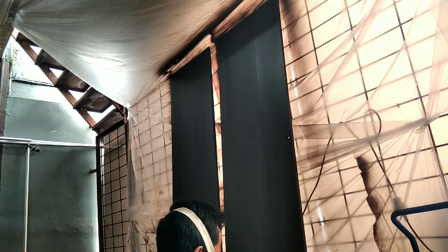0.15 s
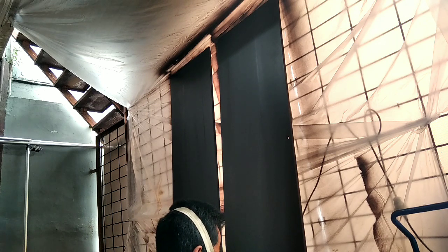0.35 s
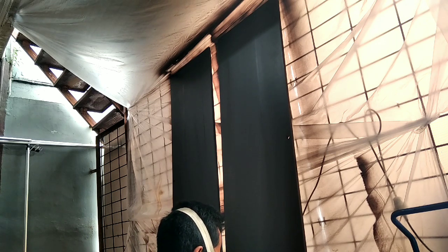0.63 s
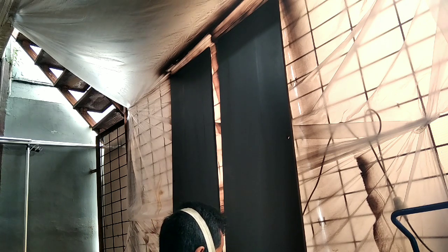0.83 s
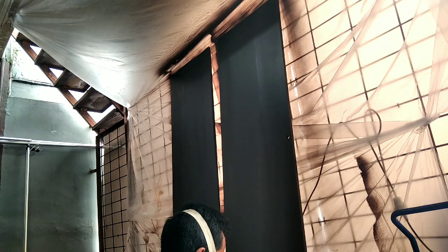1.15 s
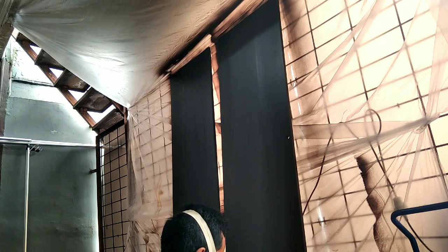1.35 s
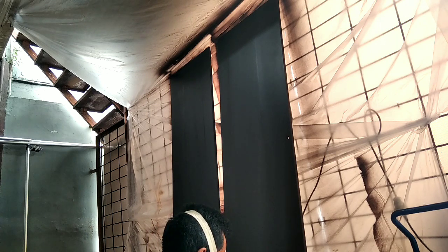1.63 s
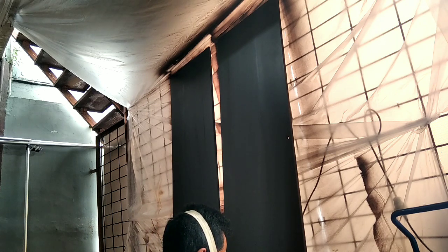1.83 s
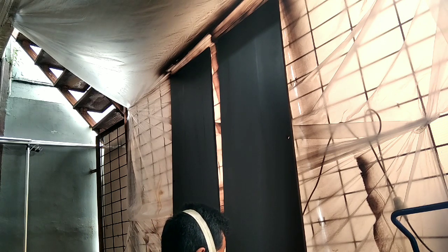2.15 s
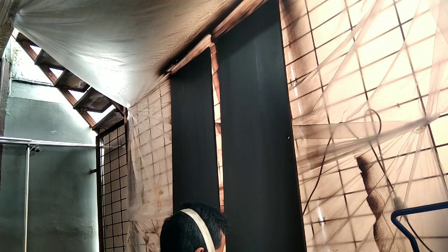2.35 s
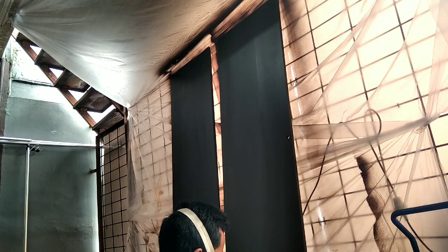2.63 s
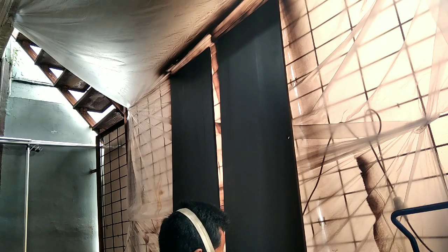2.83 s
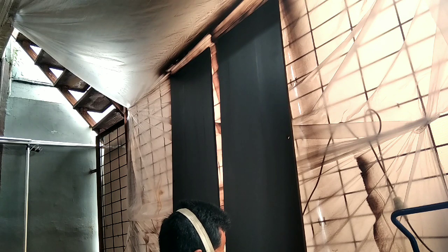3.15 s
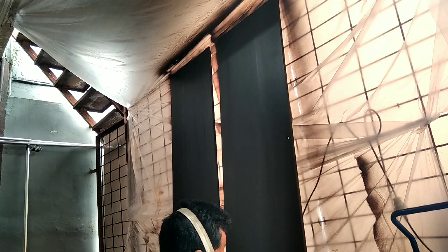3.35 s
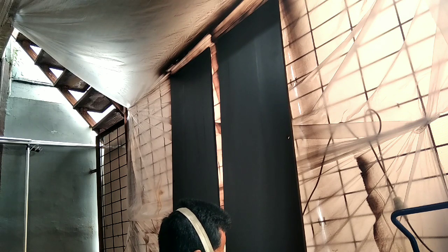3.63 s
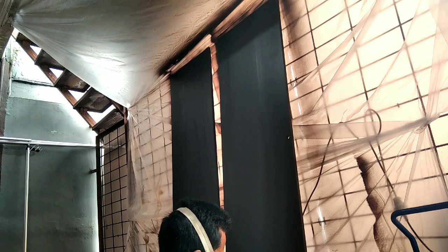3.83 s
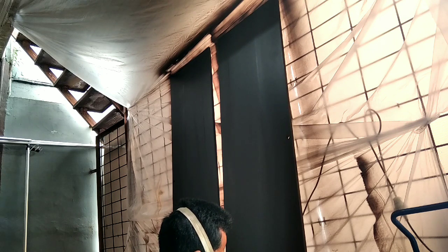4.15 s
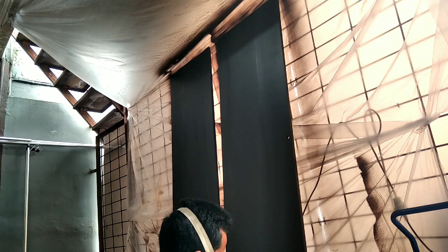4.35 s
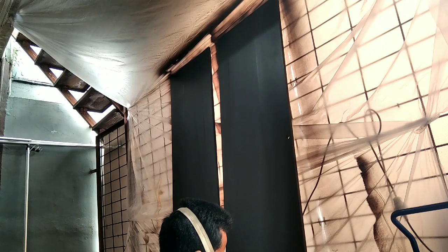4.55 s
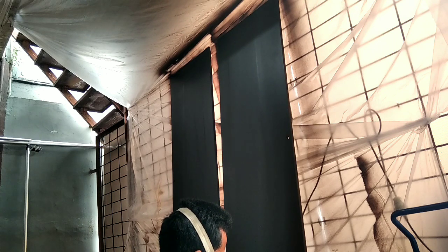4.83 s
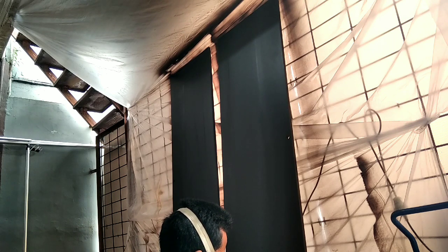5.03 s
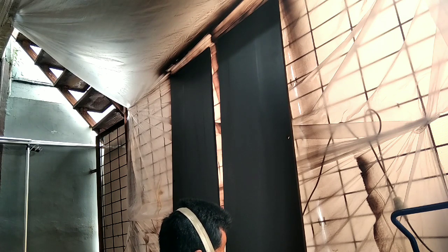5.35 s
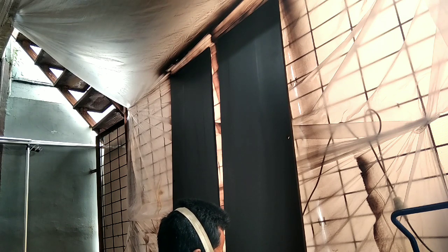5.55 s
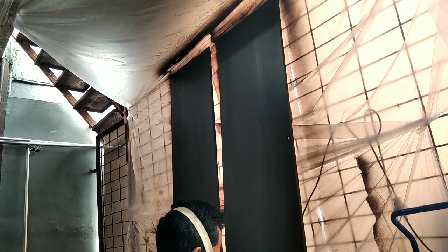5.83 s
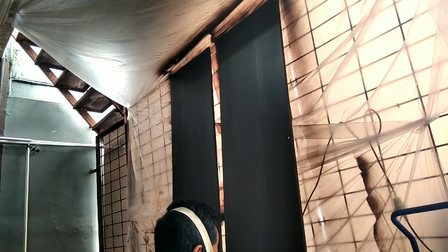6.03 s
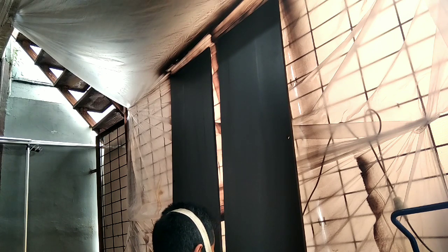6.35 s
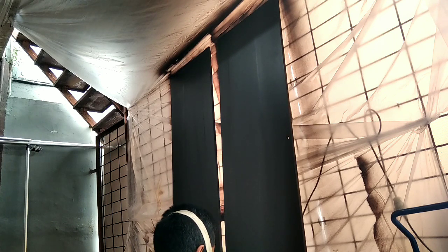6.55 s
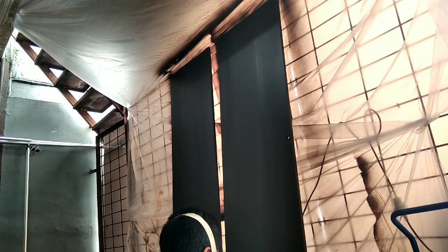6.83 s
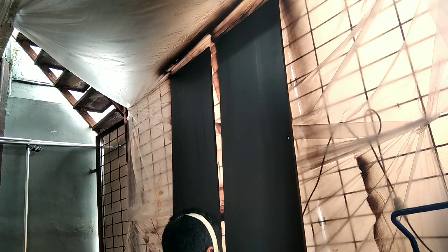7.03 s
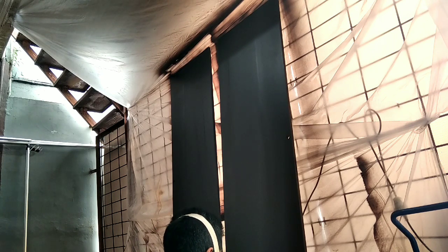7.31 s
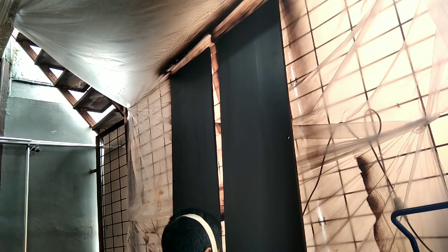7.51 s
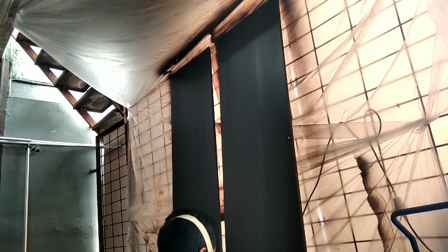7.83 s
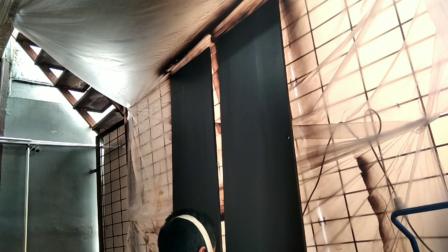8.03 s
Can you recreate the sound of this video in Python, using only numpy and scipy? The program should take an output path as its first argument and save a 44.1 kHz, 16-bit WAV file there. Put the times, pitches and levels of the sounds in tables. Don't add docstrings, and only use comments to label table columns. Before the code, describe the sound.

Steady throbbing compressor hum with hollow intake roar and thin air leak, one tiny metallic tick, then a bright paint-spray hiss at the end.

```python
import sys
import numpy as np
from scipy import signal
from scipy.fft import rfft, irfft, next_fast_len
from scipy.io import wavfile
from scipy.ndimage import uniform_filter1d, map_coordinates

SR = 44100
rng = np.random.default_rng(int(sys.argv[2]) if len(sys.argv) > 2 else 0)


def rack_gain(trim_db):
    fader = np.asarray(trim_db, float)
    return 10 ** (fader / 20)


def inscribe(sig):
    pcm = np.round(np.clip(np.atleast_2d(sig).T, -1, 1) * 32767)
    wavfile.write(sys.argv[1], SR, pcm.astype(np.int16))


N = 360738
TIME = np.arange(N) / SR
BELT_LAPS = 0.096


# t/s, speed/turns per s
CRANK_SPEED = [
    (0, 23.725),
    (8.18, 23.645),
]


def compressor():
    turns = np.cumsum(curves(CRANK_SPEED)[0]) / SR
    lap = 2 * np.pi * BELT_LAPS * turns
    puff = np.cos(2 * np.pi * turns - 1.3) + 0.7 * np.cos(4 * np.pi * turns - 2.9)
    spit_db = leak_spits()
    hum = rack_gain(0.66) * (crank_hum(turns) + second_shaft(turns))
    air = valve_whine() + valve_air(spit_db, lap, puff) + thin_leak(spit_db, lap, puff)
    return hum + intake_roar(turns, lap) + air


# order, left level/dB, right level/dB
STRONG_ORDERS = [(2, -56, -57), (4, -63, -63), (7, -61, -62), (8, -60, -57), (9, -59, -65), (10, -64, -61),
                 (11, -60, -59), (14, -51, -55), (15, -47, -49), (18, -64, -56), (19, -56, -53),
                 (21, -55, -71), (22, -55, -53), (23, -65, -58), (24, -56, -53), (25, -55, -68),
                 (26, -55, -66), (28, -51, -49), (29, -42, -41), (30, -56, -49), (31, -50, -50),
                 (38, -61, -47), (41, -60, -56), (43, -52, -56), (44, -52, -68)]
# order, level/dB
FAINT_ORDERS = [(1, -73), (5, -67), (20, -68), (27, -60), (35, -54), (45, -59), (47, -69), (50, -64)]


def crank_hum(turns):
    order, db = np.transpose(FAINT_ORDERS)
    rest = np.setdiff1d(np.arange(1, 51), [row[0] for row in STRONG_ORDERS])
    scatter_db = 1.5 * rng.standard_normal((len(rest), 2))
    level = np.interp(rest, order, db)[:, None] + scatter_db
    orders = STRONG_ORDERS + np.c_[rest, level].tolist()
    return lines(orders, turns, flutter_db=0.6, slip=0.004, spread=1.3)


# order, left level/dB, right level/dB
SHAFT_ORDERS = [(9.192, -82, -72), (10.256, -66, -63), (10.808, -65, -66), (11.288, -63, -68),
                (11.712, -67, -69), (12.288, -65, -67), (12.712, -59, -60), (13.258, -62, -60),
                (13.71, -69, -68), (14.712, -53, -50), (15.712, -62, -61), (17.712, -64, -62),
                (22.52, -54, -58), (27.52, -50, -69)]


def second_shaft(turns):
    return lines(SHAFT_ORDERS, turns, flutter_db=0.6, slip=0.017, spread=4.11)


def lines(table, turns, flutter_db, slip, spread):
    out = np.zeros((2, N))
    for order, *db in table:
        start = spread * rng.standard_normal()
        apart = 0.016 * order * rng.standard_normal()
        phase = 2 * np.pi * order * turns + start + slip * order * wobble(6)
        level = rack_gain(np.c_[db] + flutter_db * wobble(2.7))
        out += level * np.sqrt(2) * np.sin(phase + np.c_[[apart / 2, -apart / 2]])
    return out


# t/s, rise level/dB
ROAR_SURGES = [(0.11, 5), (1.45, 5.5), (1.74, 6.5), (2.33, 6.5), (3.19, 4.5), (3.5, 4.5), (4.53, 3.5),
               (5.92, 2.9), (6.33, 4.5), (6.76, 3.5), (6.88, 4), (7.15, 5.5)]
# f/Hz, level/dB per Hz
ROAR_COLOUR = [(20, -34), (45, -22), (80, -20.5), (120, -18), (240, -18), (330, -12), (430, -13.5),
               (560, -10.5), (750, -4.5), (1000, -1.5), (1150, -9), (1350, -15), (1900, -14), (2600, -25.5),
               (4000, -120)]
# f/Hz, width/Hz, left level/dB, right level/dB
ROOM_MODES = [(405, 20, -16, -15), (485, 14, -11, -10), (552, 12, -9, -11), (580, 9, -8, -12),
              (607, 9, -1, -9), (627, 9, -1, -6), (650, 9, -5, -10), (692, 10, -1, -2), (740, 9, -3, -5),
              (775, 16, -9, -7), (814, 9, -2, -6), (836, 9, -2, 0), (864, 9, 1, -6), (886, 9, 2, -5),
              (907, 9, -7, 1), (930, 8, -5, -1), (962, 7, 5, -2), (973, 7, 2, 5), (1004, 9, -10, -2),
              (1022, 9, -1, -3), (1046, 9, -9, -2), (1180, 9, -12, -16), (1208, 9, -18, -13)]


def intake_roar(turns, lap):
    stroke_db = 0.89 * np.cos(2 * np.pi * turns) + 3.1 * np.cos(4 * np.pi * turns + 0.84)
    stroke = rack_gain(stroke_db + 1.3 * wobble(20))
    source = rng.standard_normal((2, N + SR)) * np.pad(stroke, (SR, 0), "reflect")
    apart = np.exp(0.35j * rng.standard_normal((len(ROOM_MODES), 2, 1)))

    def modes(hz):
        total = 0
        for k, (centre, width, *db) in enumerate(ROOM_MODES):
            damping = 1j * hz * width
            resonance = damping / (centre * centre - hz * hz + damping)
            total = total + (-1) ** k * apart[k] * rack_gain(np.c_[db]) * resonance
        return total

    level_db = -35 + swells(ROAR_SURGES, 0.026) + 0.2 * np.cos(lap - 1.6) + 1.4 * wobble(5)
    standing = rack_gain(level_db) * unit(filtered(source[0], modes)[:, SR:])
    diffuse = rack_gain(-35.5) * coloured(shop(source[1]), ROAR_COLOUR)
    throb = rack_gain(1.1 * np.cos(2 * np.pi * (turns - 0.3)))
    return throb * (diffuse + standing)


# f/Hz, level/dB per Hz
WHINE_COLOUR = [(900, -120), (1420, -18), (1520, -7), (1550, -3), (1635, 0), (1750, -4), (1830, -15),
                (2600, -120)]
# t/s, rise level/dB
SINGING = [
    (.05, 1),
    (1.03, 4),
    (1.9, 0.5),
    (2.62, 3.5),
    (3.5, 4),
    (4.55, 2),
    (6.7, 4),
    (7.2, 3.5),
]


def valve_whine():
    sag_db = 0.13 * (TIME - 4)
    level_db = -46 - sag_db + swells(SINGING, 0.14) + 0.56 * wobble(5.9)
    return hiss(WHINE_COLOUR, level_db, point=0.32)


# f/Hz, level/dB per Hz
AIR_COLOUR = [(1100, -25), (1900, -2.5), (2330, 0), (2520, 2), (2680, -4.5), (2880, -2.5), (3130, -1),
              (4870, -4.5), (5460, -8), (6500, -6), (8450, -21), (14300, -120)]


def valve_air(spit_db, lap, puff):
    level_db = -42.5 + 0.29 * spit_db + 0.1 * np.cos(lap - 0.9) + 0.15 * puff
    return hiss(AIR_COLOUR, level_db, point=0.42)


# f/Hz, level/dB per Hz
LEAK_COLOUR = [(3200, -17), (5500, -6), (7160, -3.5), (7790, 1.5), (8570, 0), (9400, 2.5), (11500, -7),
               (12600, -5), (13500, -9.5), (14300, -13), (16000, -23.5)]


def thin_leak(spit_db, lap, puff):
    level_db = -42.5 + spit_db + 0.29 * np.cos(lap - 1.4) + 0.45 * puff + 0.38 * wobble(22)
    return hiss(LEAK_COLOUR, level_db, point=0.22)


# t/s, rise level/dB
SPITS = [(0.19, 2), (0.52, 2.6), (0.98, 2.5), (1.32, 2.1), (1.59, 1.5), (1.76, 2.8), (1.97, 1.6), (2.25, 1),
         (2.51, 0), (2.71, 2.7), (3.26, 1.5), (3.58, 1.5), (3.7, 2), (4.04, 1), (4.49, 1.3), (5.95, 3),
         (6.17, 1.9), (7.25, 2.2)]


def leak_spits():
    return swells(SPITS, 0.041)


# f/Hz, level/dB per Hz
JET_COLOUR = [(1800, -40), (3000, -7.5), (4700, -5), (6400, -5), (8000, -2), (9400, 5), (11500, -0.5),
              (13700, -1.5), (14300, -5), (16000, -16)]
# t/s, jet level/dB, left-right level/dB
TRIGGER_PULL = [
    (7.44, -40, 5.5),
    (7.476, -30.5, -5),
    (8.0, -32, -2),
    (8.18, -35.5, -5),
]


def spray():
    jet_db, pan_db = curves(TRIGGER_PULL)
    opening = np.clip((TIME - 7.448) / 0.012, 0, 1) ** 2
    jet = coloured(rng.standard_normal((2, N)), JET_COLOUR)
    balance_db = 0.27 * np.array([pan_db, -pan_db])
    return opening * rack_gain(jet_db + 3.0 + 0.43 * wobble(25) + balance_db) * jet


# t/s, peak level/dB
FITTING_TICKS = [
    (3.68, -30),
]


def ticks():
    out = np.zeros(N + SR)
    t = np.arange(SR // 10) / SR
    for s, db in FITTING_TICKS:
        decay = rack_gain(db - 60 * t / 0.033)
        rough = 1 + 0.6 * rng.standard_normal(len(t))
        out[round(s * SR):][:len(t)] += decay * np.sin(2 * np.pi * 7700 * t) * rough
    return out[:N]


# f/Hz, time to fall 60 dB/s
RING_TIME = [(100, 0.43), (1000, 0.63), (4000, 0.39), (12000, 0.11)]
# f/Hz, likeness (-1 to 1)
LIKENESS = [(60, 0.97), (130, 0.79), (290, 1), (630, 0.23), (1390, 0.85), (3060, -0.12), (6710, 0.32),
            (14700, -0.28)]


def shop(x):
    hz, t, z = signal.stft(rng.standard_normal((2, SR)), SR, nperseg=256)
    fade = rack_gain(-60 * t / along(RING_TIME, hz)[:, None])
    tails = signal.istft(z * fade, SR, nperseg=256)[1]

    def mix(f):
        angle = np.arccos(np.clip(along(LIKENESS, f), -1, 1)) / 2
        return np.array([np.cos(angle), np.sin(angle)])

    mid, side = filtered(tails, mix)
    return signal.fftconvolve(x[None], np.array([mid + side, mid - side]), axes=1)[:, SR:SR + N]


def hiss(spectrum, level_db, point):
    spot = unit(shop(rng.standard_normal(N + SR)))
    around = rng.standard_normal((2, N))
    noise = np.sqrt(point) * spot + np.sqrt(1 - point) * around
    return rack_gain(level_db) * coloured(noise, spectrum)


def swells(rows, width_s):
    return sum(db * np.exp(-((TIME - s) / width_s) ** 2) for s, db in rows)


def wobble(rate):
    return map_coordinates(rng.standard_normal(int(N * rate / SR) + 4), [TIME * rate])


def curves(rows):
    s, *cols = np.transpose(rows)
    return [np.interp(TIME, s, c) for c in cols]


def along(points, hz):
    f, v = np.transpose(points)
    return np.interp(np.log(hz + 1), np.log(f + 1), v)


def unit(x):
    return x / np.sqrt(np.mean(x ** 2) + 1e-20)


def filtered(x, response):
    m = next_fast_len(x.shape[-1] + SR)
    return irfft(rfft(x, m) * response(np.fft.rfftfreq(m, 1 / SR)), m)[..., :x.shape[-1]]


def coloured(x, spectrum):
    return unit(filtered(x, lambda hz: rack_gain(along(spectrum, hz))))


def scene():
    return compressor() + spray() + ticks()


# f/Hz, share lost when calm, share lost under the jet
DROPOUTS = [(2400, 0, 0), (2700, .12, .4), (2880, .42, .7), (3050, .015, .38), (4000, .02, .48),
            (5050, .02, .42), (5400, .12, .45), (5800, .02, .45), (6500, .01, .25), (7100, .06, .05),
            (7400, 0, 0), (12300, .03, 0), (13400, .45, 0), (14300, .45, 0)]


def starved(x):
    early = 744
    hz, t, z = signal.stft(np.pad(x, ((0, 0), (early, 0))), SR, "cosine", nperseg=2048)
    f, calm, busy = np.transpose(DROPOUTS)
    calm_share = np.interp(hz, f, calm)[:, None]
    busy_share = np.interp(hz, f, busy)[:, None]
    share = np.where(t > 7.49, busy_share, calm_share)
    band = np.arange(len(hz)) // 10
    field = uniform_filter1d(rng.standard_normal((len(hz) // 10 + 1, len(t))), 3, axis=1)
    rank = field.ravel().argsort().argsort().reshape(field.shape) / field.size
    kept = z * (rank[band] > share)
    return signal.istft(kept, SR, "cosine", nperseg=2048)[1][:, early:early + N]


def band_limit(x):
    return signal.sosfilt(signal.butter(12, 15340, fs=SR, output="sos"), x)


# f/Hz, left-right level/dB
PORT_LEAN = [(60, 0), (1500, -0.5), (2350, 2.5), (4340, 1.5), (8000, 3), (14000, 6)]


def record(dry):
    top_hz, lead_s = 14290, 0.0002

    def ports(hz):
        tilt = rack_gain(np.outer([0.5, -0.5], along(PORT_LEAN, hz)))
        lead = np.exp(np.outer([1j, -1j], np.pi * hz * lead_s))
        return tilt * lead * (hz < top_hz)

    mix = starved(filtered(dry, ports))
    return band_limit(mix)


dry = scene()
out = record(dry)
inscribe(out)
```